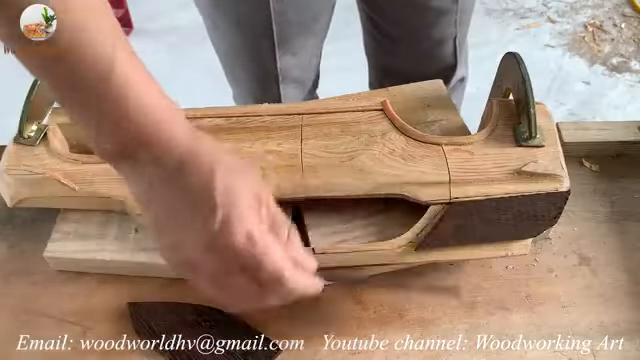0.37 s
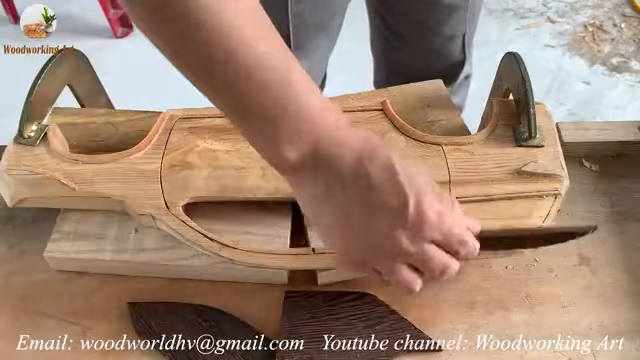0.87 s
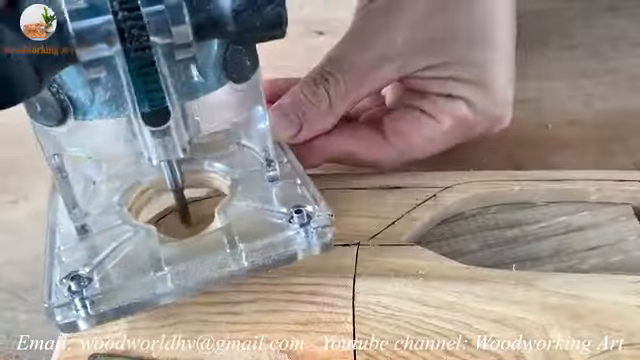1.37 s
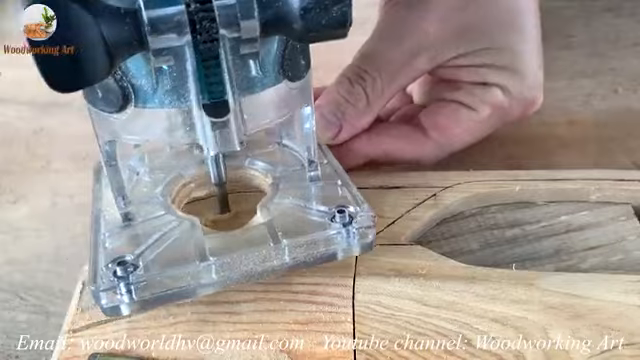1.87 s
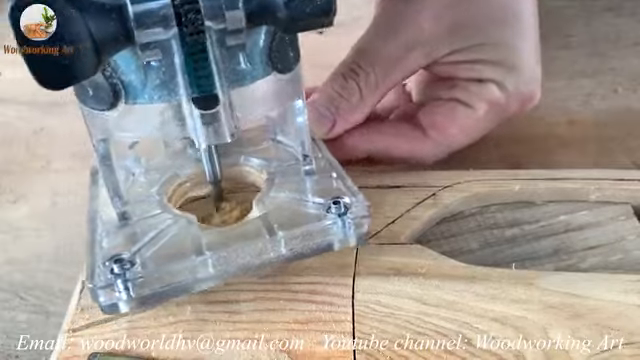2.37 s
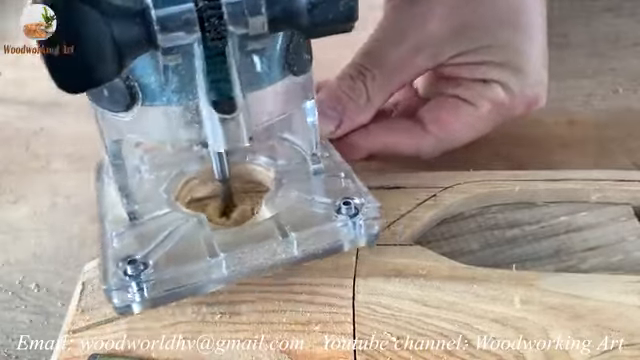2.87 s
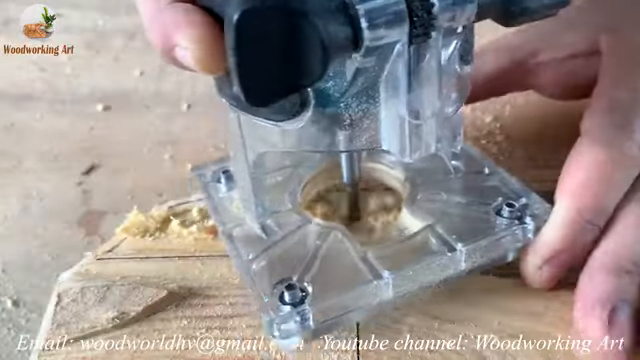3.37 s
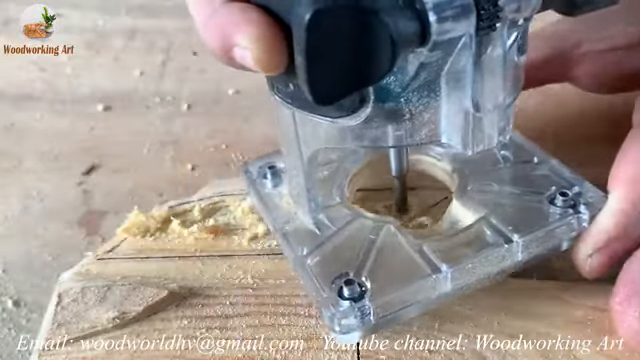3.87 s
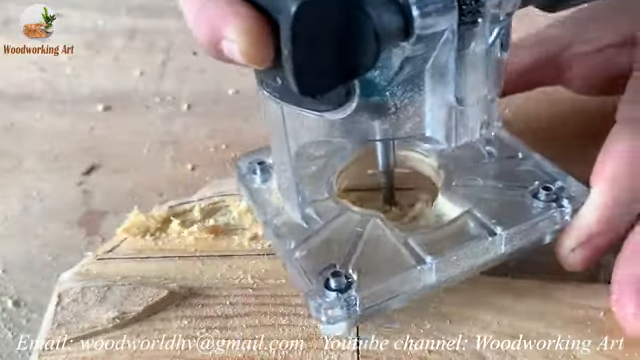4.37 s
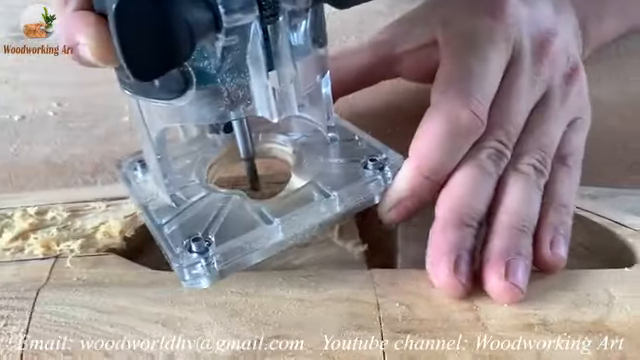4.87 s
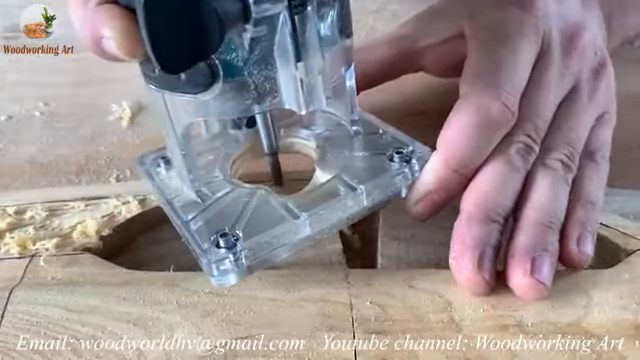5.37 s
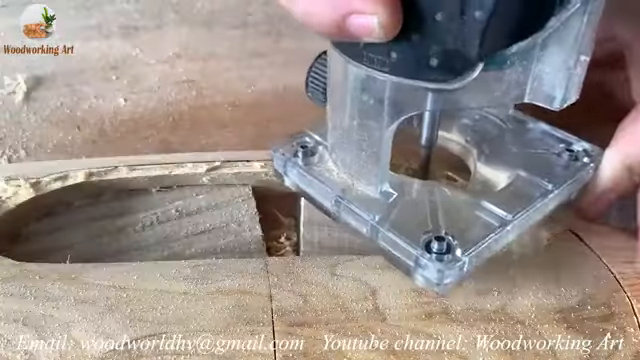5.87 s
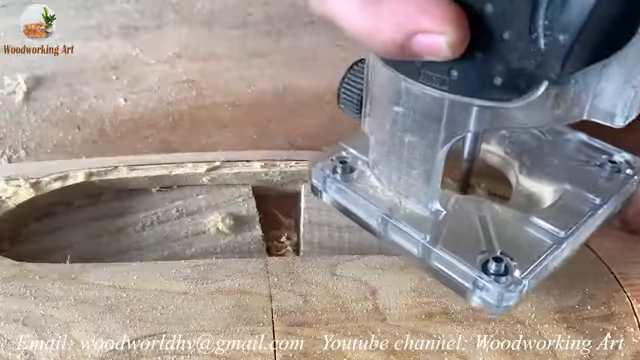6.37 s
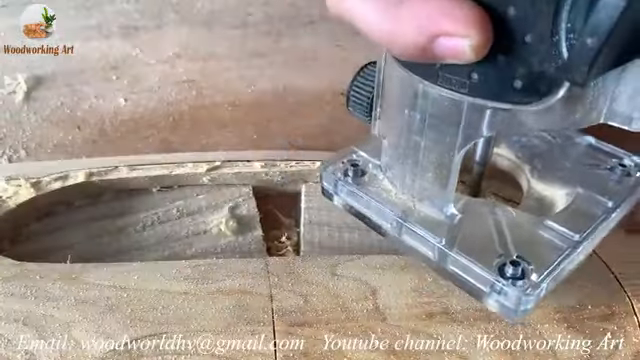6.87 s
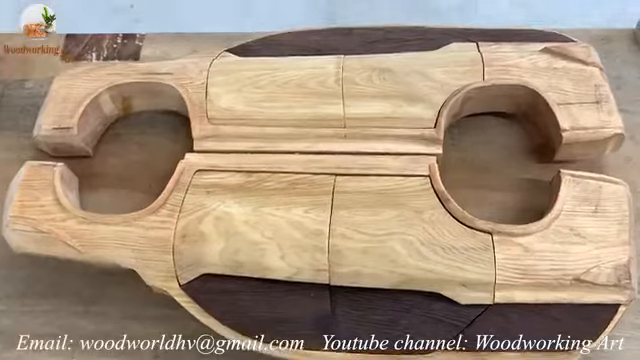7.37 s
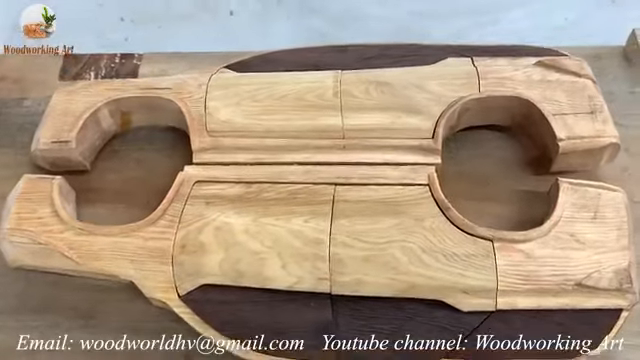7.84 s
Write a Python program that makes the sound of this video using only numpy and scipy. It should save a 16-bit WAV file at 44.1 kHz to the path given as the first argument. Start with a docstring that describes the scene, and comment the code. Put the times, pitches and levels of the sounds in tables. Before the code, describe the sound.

Quiet yard rumble and sliding wood panels with one sharp tap, then a loud trim router whines through four joined cuts, then quiet with a cricket.

```python
"""A trim router cuts four passes, heard close and joined without a pause: sine orders of the rotor make the
whine, shaped noise pulsing once a turn makes the fan air and flying chips. Before it, in an open workshop
by a road, wooden panels slide off a carving (noise through two resonances) and one is laid down with a tap
(decaying modes and a crack). Other machines hum and vehicles pass as wavering sines; after the router the
yard's rumble and rustle (coloured noise) return, with a cricket and a far rising whine (moving sines)."""
import sys
import numpy as np
from scipy import signal
from scipy.fft import rfft, irfft, next_fast_len
from scipy.io import wavfile
from scipy.ndimage import uniform_filter1d

SR = 44100
rng = np.random.default_rng(int(sys.argv[2]) if len(sys.argv) > 2 else 0)


def to_wav(s):
    """Save 16-bit WAV."""
    ch = np.atleast_2d(s).T  # columns
    pcm = np.round(np.clip(ch, -1, 1) * 32767)  # PCM
    wavfile.write(sys.argv[1], SR, pcm.astype(np.int16))


def makeup_ratio(level_db):
    """Linear amplitude ratio for a level in decibels (20 dB per factor of ten)."""
    decades = np.asarray(level_db, float) / 20
    return 10 ** decades


N = 351911
T = np.arange(N) / SR
SIDES = np.array([[1], [-1]])  # how a side signal enters left and right

# place of the router, a row a pass: share of the side air tied to the mid (0-1), its phase/rad,
# whine level in the side/dB, its phase/rad, f/Hz above which the other microphone leads
PLACE = [(.62, 1.18, -37, 1.9, 8600), (.58, 1.3, -34, 0.66, 13000), (.55, 1.46, -40.5, 1.25, 8700),
         (.55, -1.25, -38, 1.3, 8000)]
# level of each pass at zero bite: whine level/dB, 8th order level/dB, air level/dB, top air level/dB
PASS_DB = [(-25.5, -21, -28.5, -24.5), (-26, -24, -25, -28), (-27, -25.5, -27.5, -28.5),
           (-25, -33, -25, -31)]


def over_hz(table, hz):
    """A (f/Hz, value) table read on a log-frequency axis."""
    f, v = np.transpose(table)
    return np.interp(np.log(np.maximum(hz, 1)), np.log(f), v)


def over_time(table):
    """Gate of the table's span, and its columns for every sample."""
    s, *columns = np.transpose(table)
    gate = np.clip(np.minimum(T - s[0], s[-1] - T) / .0003 + .5, 0, 1)
    return gate, [np.interp(T, s, c) for c in columns]


def walk(rate):
    """Random levels held 1 / rate s and slewed twice; spread near 1."""
    hold = int(SR / rate)
    steps = np.repeat(rng.standard_normal(N // hold + 1), hold)
    return 1.337 * uniform_filter1d(uniform_filter1d(steps, hold), hold)[:N]


def band_rms(spec, hz, lo, hi):
    """Rms that a spectrum holds between two frequencies."""
    band = spec[(hz > lo) & (hz < hi)]
    return np.sqrt(2 * np.sum(np.abs(band) ** 2)) / (2 * len(hz))


def tone(hz, db, order=1):
    """Sine of a given rms on a moving pitch, as (in phase, quarter turn late)."""
    turns = order * np.cumsum(hz) / SR + rng.random()
    z = np.sqrt(2) * makeup_ratio(db) * np.exp(2j * np.pi * turns)
    return z.real, z.imag


def fade(start, end):
    """Swell shaped as the root of a half sine."""
    return np.sin(np.pi * np.clip((T - start) / (end - start), 0, 1)) ** .5


def spread_noise(colour, lo, hi):
    """Coloured noise, alike left and right in the bass, mid rms 1 in lo-hi."""
    # likeness of left and right: f/Hz, correlation (0-1)
    likeness = [(60, 1), (290, 0.67), (640, 0.018)]
    size = next_fast_len(N)
    hz = np.arange(size // 2 + 1) * SR / size
    like = np.clip(over_hz(likeness, hz), -.95, .98)
    mid, side = rfft(rng.standard_normal((2, size))) * makeup_ratio(over_hz(colour, hz))
    both = mid + SIDES * side * np.sqrt((1 - like) / (1 + like))
    return irfft(both, size)[:, :N] / band_rms(mid, hz, lo, hi)


def yard():
    """Traffic rumble under the rustle of hands, wood and leaves, as two layers of coloured noise."""
    # yard before and after the router: start t/s, end t/s, rumble level/dB, rustle level/dB
    spans = [(0, 1.401, -41.5, -54.5), (7.022, 7.982, -40, -54.5)]
    # colour of the rumble before and after: f/Hz, relative level/dB per Hz
    rumbles = [
        [(22, -14), (65, 1), (130, -0.5), (290, -7.5), (365, -10), (650, -32), (1500, -86)],
        [(22, -16), (54, 0), (130, 4.5), (374, -12.5), (540, -39), (1000, -74)],
    ]
    # colour of the rustle: f/Hz, relative level/dB per Hz
    rustle = [(240, -61), (400, 5), (647, -4.5), (878, -3.5), (1190, -5.5), (1510, -10.5), (4420, -19),
              (7400, -31.5), (8300, -26.5), (9200, -32), (10800, -37), (11400, -50)]
    out = 0
    for (start, end, rumble_db, rustle_db), rumble in zip(spans, rumbles):
        gate = over_time([(start,), (end,)])[0]
        # the rumble leans to the right
        low = makeup_ratio(rumble_db + .7 * walk(25) - SIDES * .8) * spread_noise(rumble, lo=35, hi=300)
        high = makeup_ratio(rustle_db + .7 * walk(40)) * spread_noise(rustle, lo=600, hi=4000)
        out = out + gate * (low + high)
    return out


def hums():
    """Other machines hum: sines that swell and waver in pitch and level."""
    # hums: start t/s, end t/s, f/Hz, level/dB
    hum_rows = [(0, .75, 64, -44), (1.1, 1.39, 157, -50), (.72, 1.39, 365, -53.5), (.85, 1.3, 287, -50),
                (.3, 1.1, 131, -50), (2.65, 3.11, 213, -54.5), (3.55, 4.3, 485, -58),
                (4.58, 4.88, 276, -53), (4.95, 5.78, 296, -49), (7.08, 7.5, 2400, -67)]
    out = 0
    for start, end, hz, db in hum_rows:
        pitch = hz * (1 + 0.004 * walk(8))
        out = out + fade(start, end) * tone(pitch, db + 2 * walk(8.3))[0]
    return out


def scrape():
    """Wood slides on wood: uneven slips ring a low and a high band of the panel."""
    # panels sliding: start t/s, end t/s, first level/dB, last level/dB, low band above high band/dB
    slides = [(.177, .215, -51, -58, 9), (.215, .33, -56, -56, 11), (.222, .262, -64, -68, 19),
              (.33, .62, -59, -59, 11), (.62, .766, -56, -53, 7)]
    slips = rng.standard_normal((2, N)) * makeup_ratio(1.5 * walk(300) + .6 * walk(60))
    slips = slips[0] + .85 * slips[1] * SIDES
    slips = signal.sosfilt(signal.butter(4, 11000, fs=SR, output="sos"), slips)
    bands = []
    for hz, width_hz in ((950, 1400), (2600, 4600)):
        ring = signal.iirpeak(hz, hz / width_hz, fs=SR)
        band = signal.lfilter(*ring, signal.lfilter(*ring, slips))
        bands.append(band / band.std())
    out = 0
    for start, end, first_db, last_db, low_db in slides:
        gate, (db,) = over_time([(start, first_db), (end, last_db)])
        out = out + gate * makeup_ratio(db) * (makeup_ratio(low_db) * bands[0] + bands[1])
    return out


def taps():
    """A short noise crack and the panel's decaying modes, new strengths at every tap."""
    # panel taps: t/s, level of the ring's peak ahead of the low-pass/dB, left minus right/dB, crack factor
    tap_rows = [(0.631, -12, 1, 0.59), (0.6454, -34, -0.5, 0.5), (0.754, -35, 0.5, 0.57)]
    # modes of the panel: f/Hz, relative level/dB, time to fall 60 dB/s
    modes = [(1400, 0, 0.025), (1970, -13, 0.026), (2250, 11, 0.016), (2970, -3, 0.011), (4430, 2, 0.0074),
             (6600, -6, 0.011)]
    lag_s = .00007  # the right microphone hears the ring later
    out, t = np.zeros((2, N)), T[:3000]
    for s, db, pan_db, crack in tap_rows:
        ring = 0
        for f, mode_db, t60 in modes:
            strength = makeup_ratio(mode_db + 1.2 * rng.standard_normal())
            wave = np.sin(2 * np.pi * f * (t + SIDES * lag_s / 2))
            ring = ring + strength * wave * 1000. ** (-t / t60)
        burst = uniform_filter1d(uniform_filter1d(rng.standard_normal((2, len(t))), size=4), size=3)
        burst = burst - uniform_filter1d(burst, size=16)  # takes out the bass
        burst = burst * np.exp(-t / 0.002) * (1 - np.exp(-t / 0.00024))
        i = int(s * SR)
        hit = ring / np.abs(ring).max() + abs(crack) * burst
        out[:, i:i + len(t)] += makeup_ratio(db + SIDES * pan_db / 2) * hit
    return signal.sosfilt(signal.butter(4, 9500, fs=SR, output="sos"), out)


def faded(order):
    """Gain of a rotor order: 1 but for its brief fades as the tool moves."""
    # fades: t/s, half length/s, depth/dB, order
    dips = [(1.84, 0.13, 8, 1), (2.045, 0.13, 43, 1), (2.581, 0.055, 23, 1), (3.247, 0.015, 43, 1),
            (3.703, 0.038, 18, 1), (4.314, 0.035, 15, 1), (4.384, 0.026, 10, 1), (6.978, 0.065, 16, 6)]
    gain = np.ones(N)
    for s, half, depth_db, which in dips:
        if which == order:
            gain *= 1 - (1 - makeup_ratio(-depth_db)) * np.exp(-((T - s) / half) ** 2)
    return gain


def whine(rotor, bite, k):
    """Clean sine orders of the rotor; each wavers as the tool moves and has its own width."""
    # weaker rotor orders: order, level/dB in pass 1, 2, 3, 4
    weak_orders = [(2, -38, -39.5, -41.5, -46), (3, -39, -34.5, -58, -48), (4, -42, -36, -44, -35),
                   (5, -47, -56, -48, -39), (6, -44, -41, -49, -35), (7, -37.5, -42, -44, -49)]
    # width of the rotor orders: order, side minus mid/dB in pass 1, 2, 3, 4
    order_width = [(2, 1, -1, 3, 3), (3, 1, -5, 22, 1), (4, 1, -3, 12, 0), (5, 10, 3, 16, -6),
                   (6, 11, -3, 4, -1), (7, -1, 0, -8, -1), (8, -5, 10, 1, -8)]
    _, phase, side_db, side_phase, _ = PLACE[k]
    first_db = PASS_DB[k][0]
    eighth_db = PASS_DB[k][1] + 1.2 * bite
    rotor = rotor * (1 + 0.00017 * walk(40))
    now, late = tone(rotor, 0)
    turned = np.cos(side_phase) * now + np.sin(side_phase) * late
    side = makeup_ratio(side_db + 2.5 * walk(4)) * turned
    mid = makeup_ratio(first_db + 0.53 * walk(18) + 1.24 * walk(6.4)) * faded(order=1) * now
    out = mid + side * SIDES
    levels = {row[0]: row[k + 1] + 3 * walk(16) for row in weak_orders}
    for order, *width_db in order_width:
        wide = makeup_ratio(width_db[k])
        # the 8th order shares its whole level between mid and side
        shared_db = eighth_db + 1.8 * walk(25) - 10 * np.log10(1 + wide ** 2)
        now, late = tone(rotor, levels.get(order, shared_db), order=order)
        turned = np.cos(phase) * now - np.sin(np.abs(phase)) * late
        side = wide * makeup_ratio(1.3 * walk(5)) * turned
        out = out + faded(order) * (now + side * SIDES)
    return out


def air(rotor, span, k, low_db, top_db):
    """Fan air and chips: shaped noise pulsing once a turn; the top of it swells on its own."""
    # colour of the air in the mid: f/Hz, relative level/dB per Hz in pass 1, 2, 3, 4
    mid_colour = [(60, -45.5, -41, -31, -38), (128, -21, -26, -25, -29), (270, -15.5, -17.5, -14, -18),
                  (570, -16, -17, -18, -22), (672, -3.5, -7.5, -8, -14), (1016, -11, -13.5, -14, -19.5),
                  (1580, -6, -7.5, -9.5, -15), (1750, -11, -13.5, -12.5, -22), (2475, 3.5, 1.5, -2.5, -6.5),
                  (3530, 2, -0.5, -8.5, -9), (4590, 1.5, 4.5, 2.5, 2), (5890, 2.5, 2, -2.5, -4),
                  (7870, -5.5, -3.5, -17, -14), (11650, 9.5, -1.5, -6, -3.5),
                  (15300, 4.5, -4.5, -8.5, -5.5)]
    # the same in the side: f/Hz, relative level/dB per Hz in pass 1, 2, 3, 4
    side_colour = [(130, -42, -40, -26, -39), (519, -32.5, -26, -21, -30), (1385, -22, -26, -27, -29),
                   (1950, -10, -13, -16, -24), (2640, 2, -0.5, -5.5, -31), (3870, -1, -10, -6, -14),
                   (5020, 5.5, -4, -2.5, -4.5), (6340, 4, -4, -3, -12), (8280, 5.5, -2, -12, -9.5),
                   (12000, 4, -1.5, -4.5, -5), (15550, -1, -1, -11, -5)]
    # narrow dips and bumps in the colour of the air, a list a pass: f/Hz, mid level/dB, side level/dB
    dips_and_bumps = [
        [(3600, 0, -14), (4100, -6.5, 4.5), (5170, -5.5, -3.5), (6950, -4.5, 1), (7650, 8.5, -1), (8600, -1, 0)],
        [(3600, 1, -7), (4020, 3, 8), (5420, -6, 0), (8140, -5, 0)],
        [(4150, 2.5, -13), (6300, -5, 1)],
        [(7400, 9, -10), (8370, -7, 2), (15400, 6, 6)],
    ]
    size = next_fast_len(span.stop - span.start)
    hz = np.arange(size // 2 + 1) * SR / size
    turn = np.cumsum(np.resize(rotor[span], size)) / SR
    pulse = 1 + 0.23 * np.cos(2 * np.pi * turn)
    tied_noise, free_noise = rfft(rng.standard_normal((2, size)) * pulse)
    mid_gain = makeup_ratio(over_hz(np.array(mid_colour)[:, [0, k + 1]], hz))
    side_gain = makeup_ratio(over_hz(np.array(side_colour)[:, [0, k + 1]], hz))
    for at_hz, mid_db, side_db in dips_and_bumps[k]:
        near = np.exp(-((hz - at_hz) / 234) ** 2)
        mid_gain = mid_gain * makeup_ratio(mid_db * near)
        side_gain = side_gain * makeup_ratio(side_db * near)
    mid = mid_gain * tied_noise * np.minimum(hz / 60, 1) ** 3
    top = 1 / (1 + (8000 / np.maximum(hz, 1)) ** 8)
    tied, phase, _, _, swap_hz = PLACE[k]
    # the side is turned 0.6 rad further in the top air
    lead = np.exp(1j * (phase + np.copysign(0.6, phase) * top) * np.sign(swap_hz - hz))
    side = side_gain * (tied * lead * tied_noise + np.sqrt(1 - tied ** 2) * free_noise) * (hz > 100)
    out = np.zeros((2, N))
    for share, db, lo, hi in ((1 - top, low_db, 2000, 6000), (top, top_db, 9500, 12300)):
        layer = irfft((mid + SIDES * side) * share, size) / band_rms(mid, hz, lo, hi)
        swell = makeup_ratio(db + 0.51 * walk(9) + 0.67 * walk(300))
        out[:, span] += layer[:, :span.stop - span.start] * swell[span]
    return out


def swells(rotor, first_s, last_s):
    """Brief extra tones at fixed ratios to the rotor speed, some whole and some not, those that overlap the
    given span."""
    # swells: start t/s, end t/s, ratio to the rotor speed, level/dB, side to mid ratio
    swell_rows = [(1.25, 1.62, 4, -28.5, 1), (2.3, 2.68, 4, -32, .8), (2.74, 3.05, 4, -34, 1),
                  (1.2, 1.55, 3, -32.5, .9), (1.2, 2.2, 6.72, -31, .4), (1.71, 2.09, 7.72, -30, .8),
                  (2.52, 2.72, 7.67, -23, 0.83), (1.56, 2.22, 5.73, -35, 3.1), (2.44, 2.82, 5.73, -34, 2.5),
                  (1.48, 1.74, 2, -32.5, .3), (3.112, 3.4, 3, -33, 1), (4.58, 4.95, 6, -41, 4)]
    out = np.zeros((2, N))
    for start, end, order, db, wide in swell_rows:
        if start < last_s and end > first_s:
            now, late = tone(rotor * order, db + 3 * walk(39.97))
            out += fade(start, end) * (now + wide * late * SIDES)
    return out


def router():
    """Four passes, each from its own place; a deeper bite lifts the air and the 8th order."""
    # router passes, a list a pass: t/s, rotor f/Hz, bite of the cutter/dB
    passes = [
        [(1.396, 1642, 3), (1.5, 1637, 3), (1.76, 1605.5, 4), (1.9, 1598.5, 2), (2.06, 1593, 0),
         (2.28, 1604, 0), (2.5, 1610, .3), (2.73, 1590, -.5), (2.86, 1591, -.3), (3.1115, 1611, -.7)],
        [(3.1115, 1637, .5), (3.26, 1628, .3), (3.38, 1636.5, .3), (3.5, 1627.5, .2), (3.65, 1644.5, .2),
         (3.78, 1634, -.2), (3.92, 1640.5, -.2), (4.22, 1646, -.3), (4.43, 1634, -.3), (4.579, 1634, -.4)],
        [(4.579, 1689, .6), (5.312, 1685.5, -.2), (5.702, 1690, -.6), (5.795, 1689.5, -.6)],
        [(5.795, 1707, -.6), (6.208, 1700, .2), (6.588, 1703.3, .3), (6.758, 1707.4, .2), (7.029, 1711.5, .2)],
    ]
    out = 0
    for k, rows in enumerate(passes):
        gate, (rotor, bite) = over_time(rows)
        rotor = uniform_filter1d(rotor, int(.06 * SR))  # the speed slews over 60 ms
        on = np.flatnonzero(gate)
        span = slice(on[0], on[-1] + 1)
        air_db, top_db = PASS_DB[k][2:]
        sound = whine(rotor, bite, k)
        sound += air(rotor, span, k, air_db + 0.59 * bite, top_db + bite)
        sound += swells(rotor, rows[0][0], rows[-1][0])
        out = out + gate * sound
    return out


def vehicles():
    """A vehicle speeds up outside, then another: wavering sine orders of the firing rate."""
    # vehicles, a list each: t/s, firing f/Hz, level/dB
    drives = [
        [(4.64, 68.3, -60), (4.76, 70.4, -46), (4.96, 73.7, -57), (5.15, 77, -46.5), (5.676, 85.85, -45),
         (5.79, 86.4, -45)],
        [(5.8, 78.5, -51), (6.08, 81, -54)],
    ]
    # orders of the firing rate: multiple, relative level/dB
    firing_orders = [(2, -8), (3, -12), (4, -10), (5, -5.5), (6, -4)]
    out = 0
    for rows in drives:
        gate, (hz, db) = over_time(rows)
        for order, order_db in firing_orders:
            # little is heard below 150 Hz or above 505 Hz, and each order comes and goes
            heard = gate / (1 + (150 / (order * hz)) ** 12) / (1 + (order * hz / 505) ** 24)
            pitch = hz * (1 + .004 * walk(12))
            out = out + heard * tone(pitch, db + order_db + 3 * walk(11), order=order)[0]
    return out


def cricket():
    """Near-sine chirps that throb unevenly."""
    # chirps: start t/s, length/s, f/Hz, level/dB
    chirps = [(7.04, .07, 4500, -56), (7.08, .27, 4490, -63), (7.37, .14, 4530, -64),
              (7.495, .09, 4545, -48), (7.575, .085, 4535, -50), (7.652, .055, 4530, -47),
              (7.7, .05, 4520, -47), (7.74, .17, 4490, -58)]
    throb = np.clip(1 + .42 * walk(70), .1, 2)
    out = 0
    for start, length, hz, db in chirps:
        now, late = tone(hz * (1 + .002 * walk(150)), db)
        out = out + fade(start, start + length) ** 1.4 * (now + 0.65 * late * SIDES)
    return throb * out


def far_whine():
    """A far whine rises: an unsteady sine and its swelling octave."""
    # whine: t/s, f/Hz, level/dB
    rise = [(7.58, 630, -71), (7.79, 700, -57), (7.86, 745, -62), (7.95, 800, -49), (7.98, 810, -55)]
    gate, (hz, db) = over_time(rise)
    hz = hz * (1 + .012 * walk(30))
    octave = fade(7.55, 7.98) ** 2 * tone(hz, -63 + 3.5 * walk(25), order=2)[0]
    return gate * (tone(hz, db + 3 * walk(25))[0] + octave)


def scene():
    """Everything at the two microphones."""
    before = yard() + hums() + scrape() + taps()  # the yard and the hums also sound later
    return before + router() + vehicles() + cricket() + far_whine()


def roll_off(x):
    """The treble ends steeply here."""
    return signal.sosfilt(signal.butter(12, 17080, fs=SR, output="sos"), x)


def record(dry):
    """The recorder cuts the top: a smooth slope over the 80 Hz below 15790 Hz."""
    size = next_fast_len(N)
    hz = np.arange(size // 2 + 1) * SR / size
    below = np.clip((15790 - hz) / 80, 0, 1)
    slope = np.sin(np.pi / 2 * below) ** 2
    mix = irfft(rfft(dry, size) * slope, size)[:, :N]
    return roll_off(mix)


dry = scene()
out = record(dry)
to_wav(out)
```